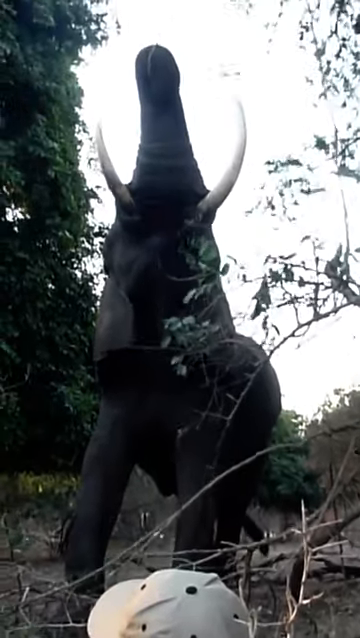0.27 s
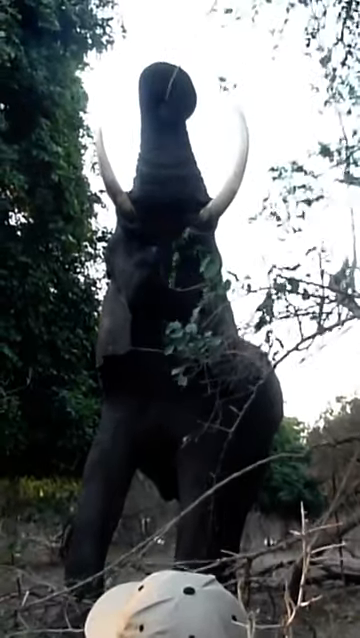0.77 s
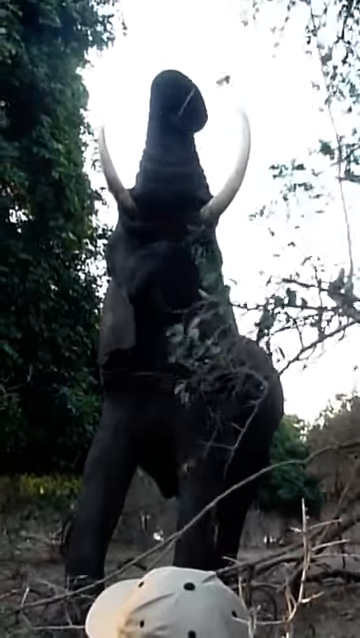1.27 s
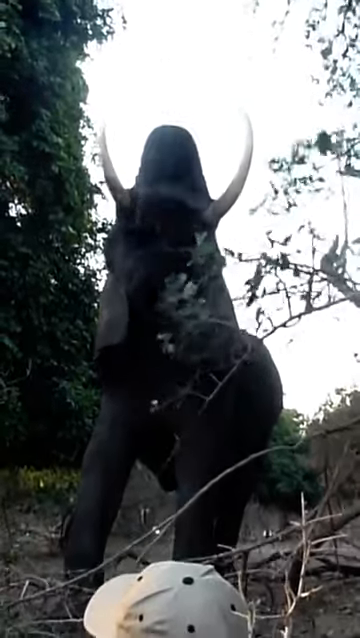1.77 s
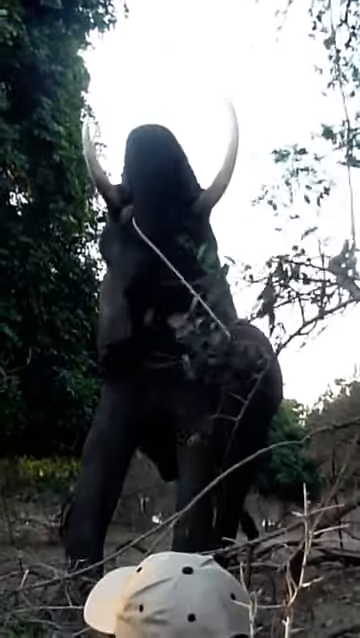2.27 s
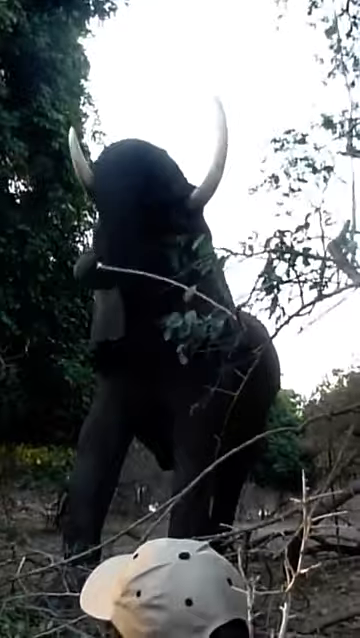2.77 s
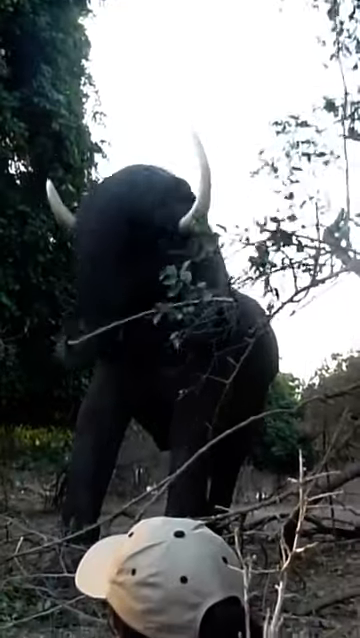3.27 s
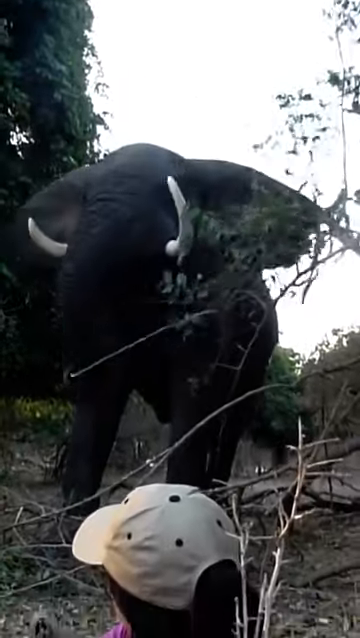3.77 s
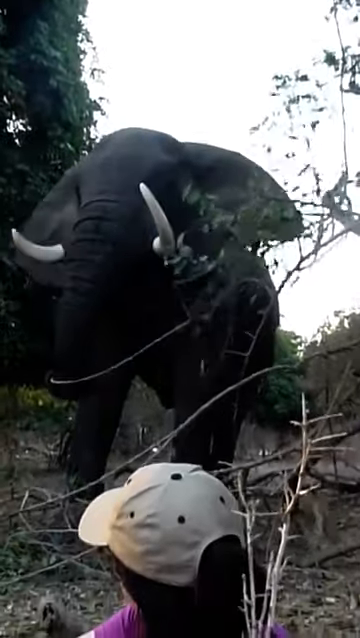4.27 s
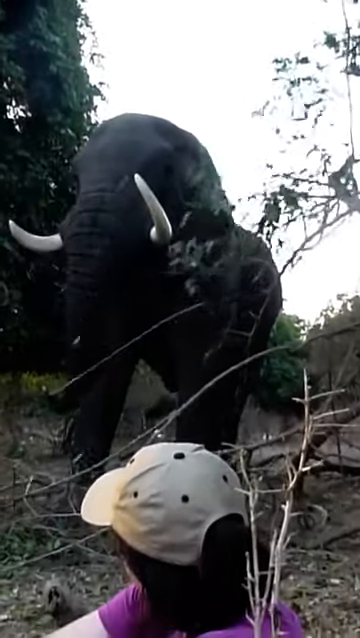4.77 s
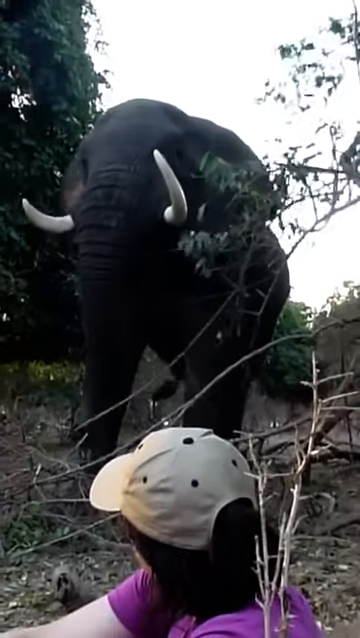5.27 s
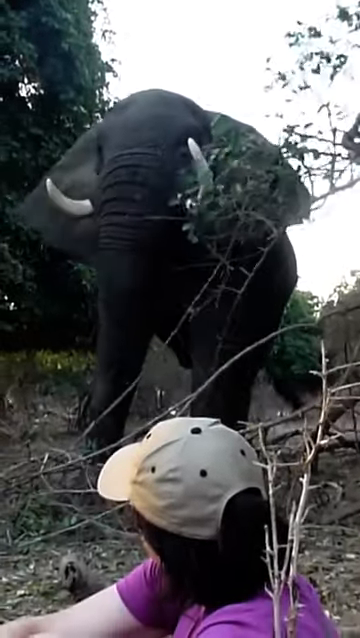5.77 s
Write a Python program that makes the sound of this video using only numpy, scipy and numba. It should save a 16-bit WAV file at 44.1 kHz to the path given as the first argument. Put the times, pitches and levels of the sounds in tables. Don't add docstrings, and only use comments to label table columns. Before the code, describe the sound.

Dry crackling twigs and swelling leaf rustle close by for about four and a half seconds, fading to still air with brief bird whistles.

```python
import sys
import numpy as np
from scipy import signal
from scipy.fft import rfft, irfft
from scipy.io import wavfile
from scipy.ndimage import uniform_filter1d
from numba import njit

SR = 44100
rng = np.random.default_rng(int(sys.argv[2]) if len(sys.argv) > 2 else 0)


def volts_from_decibels(level):
    exponent = np.asarray(level, float) / 20
    return 10 ** exponent


def materialize(psi):
    bounded = np.clip(np.atleast_2d(psi).T, -1, 1)
    quanta = np.round(bounded * 32767).astype(np.int16)
    wavfile.write(sys.argv[1], SR, quanta)


N = 265482
T = np.arange(N) / SR
BINS = np.fft.rfftfreq(N, 1 / SR) + 1e-9

# start_s, level_db, left_minus_right_db
STIR = [(0, -36, 0.5), (.1, -39.5, 1), (.33, -38.5, 0), (.59, -42.5, 1), (1.24, -43, .5), (1.46, -40, 0),
        (1.63, -41, 0.5), (2.18, -38, -0.5), (2.43, -43.5, .5), (2.92, -43.5, 0), (3.45, -41.5, 0),
        (3.7, -47.5, -.5), (3.94, -37.5, 0), (4.32, -41.5, -1), (4.62, -43.5, -0.5), (5.16, -53, -1),
        (5.6, -57, -.5), (6.02, -52.5, -1)]
# pitch_hz, level_db (per Hz)
CRACK_COLOUR = [(180, -51), (300, -26), (1280, -48), (1730, 0), (2910, -12), (6150, 8), (7280, 7.5),
                (10700, 4), (11500, -22), (15000, -52), (22000, -120)]


def unit(x):
    return x / np.sqrt(np.mean(x ** 2))


def on_bins(points):
    hz, value = np.transpose(points)
    return np.interp(np.log(BINS), np.log(hz), value)


def colour(x, gain):
    return irfft(rfft(x) * gain, N)


def spread(mid, side):
    # pitch_hz, likeness (0-1)
    likeness = [(30, .68), (100, 0.74), (300, 0.59), (700, 0.58), (4000, 0.58), (7000, 0.43), (10000, 0.26)]
    like = np.clip(on_bins(likeness), 0, 1)
    mid = colour(mid, np.sqrt((1 + like) / 2))
    side = colour(side, np.sqrt((1 - like) / 2))
    return np.array([mid + side, mid - side])


def panned(pan_db):
    return volts_from_decibels(np.array([pan_db, -pan_db]) / 2)


def walk(per_s):
    hold = int(SR / per_s)
    steps = np.repeat(rng.standard_normal(N // hold + 1), hold)
    return uniform_filter1d(steps, hold)[:N]


@njit
def grains(start, hz, t60, size, n):
    out = np.zeros(n)
    for g in range(len(start)):
        turn = np.exp(2j * np.pi * hz[g] / SR - np.log(1000) / (t60[g] * SR))
        ring = size[g] + 0j
        for i in range(start[g], min(n, start[g] + int(t60[g] * SR))):
            out[i] += ring.real
            ring *= turn
    return out


def leaf_noise(per_s, cycles, scatter_db, hiss_db):
    when, height, luck, sign = rng.random((int(per_s * N / SR), 4)).T
    hz = 700 * 15 ** height
    size = volts_from_decibels(-scatter_db * np.log(luck + 1e-4)) * np.sign(sign - 0.5)
    near = grains((when * N).astype(np.int64), hz, cycles / hz, size, N)
    near = colour(near, np.sqrt(BINS))
    return unit(near) + volts_from_decibels(hiss_db) * rng.standard_normal(N)


def tugs():
    # start_s, hold_s, leaves_db, wood_db
    pulls = [(0.19, 0.054, -31.5, -49.5), (0.348, 0.09, -32, -51.5), (0.617, 0.093, -43.5, -67),
             (0.885, 0.13, -40, -50.5), (1.087, 0.048, -39.5, -50), (1.29, 0.09, -33, -46.5),
             (1.384, 0.22, -32.5, -48), (1.84, 0.035, -36, -46), (2.105, 0.057, -37.5, -47),
             (2.621, 0.044, -36.5, -47), (3.025, 0.027, -39, -46), (3.334, 0.13, -56, -50),
             (3.751, 0.022, -35.5, -46.5), (3.913, 0.085, -38.5, -48), (4.128, .12, -40, -47.5),
             (2.458, .08, -47, -48.5), (4.048, 0.059, -34.5, -44), (4.415, .07, -33, -46),
             (4.487, .02, -29, -50), (4.605, 0.072, -44, -57.5)]
    attack_s, fall_db_s = 0.029, 185
    power = np.zeros((2, N))
    for s, hold_s, leaves_db, wood_db in pulls:
        swell = np.clip((T - s) / attack_s + 0.5, 0, 1)
        release = volts_from_decibels(-fall_db_s * np.clip(T - s - hold_s, 0, 1))
        power += (volts_from_decibels([[leaves_db], [wood_db]]) * swell * release) ** 2
    return power


def all_twigs():
    # start_s, peak_db, ring_hz, leaves_db (under the crack)
    green = [(.141, -26, 3540, -7.5), (.18, -21, 5810, -12.5), (0.2179, -7, 6000, -16),
             (.507, -10.5, 7550, -17.5), (0.728, -22.5, 4710, -10), (1.1263, -22, 5640, -19),
             (1.6033, -22, 6830, -15), (1.8147, -24.5, 5800, -9), (1.9535, -34, 3490, -9),
             (2.141, -18, 7600, -9.5), (2.469, -28, 4410, -7), (2.7229, -18, 4430, -11.5),
             (3.1064, -28, 2700, -15), (3.238, -32, 2990, -7), (3.376, -24.5, 2960, -12),
             (3.484, -28.5, 2700, -6.5), (3.522, -23.5, 7990, -13.5), (4.038, -14.5, 5380, -9.5),
             (4.244, -25, 2800, -10.5), (4.3492, -27, 3190, -13), (4.481, -20, 3710, -9),
             (4.6586, -20, 2680, -20), (4.9926, -41, 3690, -6), (5.6735, -24.5, 7790, -18.5)]
    # start_s, peak_db, ring_hz, left_minus_right_db, leaves_db (under the crack)
    brittle = [(0.2446, -17, 5220, .5, -15), (0.3715, -7, 4220, 6, -17.5), (1.2751, -15, 7300, 3.5, -9.5),
               (1.2782, -11.5, 6800, 3, -17.5), (1.331, -20, 8200, 1, -17), (1.3915, -17, 8000, 1, -20),
               (1.2953, -15, 6500, 1, -17), (1.341, -20, 3700, -6, -18), (1.3877, -1.5, 7600, 3, -20.5),
               (1.4377, -14, 5640, 0, -20), (1.5853, -16, 9290, 1, -22), (1.9937, -1.5, 7000, 1.5, -16),
               (2.094, -15.5, 8200, -1, -13), (2.1193, -18, 6600, -3, -19), (2.6108, -15.5, 7500, 4, -13),
               (3.419, -19, 8600, 2, -12.5), (3.6176, -11.5, 6700, -1.5, -16.5),
               (3.7386, -16, 9620, -1, -17), (3.7908, -21, 8410, -1.5, -26),
               (3.807, -18.5, 4260, -3.5, -11.5), (3.8293, -9, 6400, -4.5, -9.5),
               (4.079, -18.5, 6630, 0, -5), (4.1424, -14, 5900, -.5, -18), (4.1862, -8, 6400, -2, -15.5),
               (4.5029, -4, 8000, -2.5, -14)]
    # start_s, peak_db, ring_hz, left_minus_right_db
    small = [(0.3545, -21, 6490, 7), (.4294, -31, 4310, 1), (0.8833, -28, 3800, 4),
             (0.9773, -21.5, 5900, 6), (1.929, -29, 2950, -4), (2.2894, -23, 7040, 1),
             (2.4254, -27, 6540, 3), (2.6328, -21, 4840, 5), (2.809, -30, 6580, -6), (2.834, -21, 7040, 2),
             (3.034, -24, 6180, 0), (3.151, -21.5, 6230, -4), (3.258, -19.5, 7000, -3),
             (3.354, -33, 4380, -1), (3.652, -26, 2900, -2), (3.9065, -31, 5610, 2),
             (3.9906, -19.5, 3170, -1.5), (4.062, -15, 6360, -1), (4.522, -19, 3700, -1),
             (4.604, -21.5, 2700, -3), (4.9545, -27.5, 2970, -3), (5.2304, -34, 3820, -1.5)]
    stir_s, _, stir_pan_db = np.transpose(STIR)
    rows = []
    for s, peak_db, hz, leaves_db in green:
        pan_db = np.interp(s, stir_s, stir_pan_db)
        fall_db = 5 + 0.09 * peak_db
        rows.append((s, peak_db, hz, pan_db, leaves_db, fall_db))
    rows += [(*twig, 7.5) for twig in brittle]
    rows += [(*twig, -12.5, 10.5) for twig in small]
    return rows


def after_twigs(rise_s):
    power = np.zeros((2, N))
    for s, peak_db, _, pan_db, leaves_db, fall_db in all_twigs():
        i = slice(max(int(s * SR) - 600, 0), int(s * SR) + 9000)
        age = T[i] - s - 0.0007
        strain_s = rise_s * volts_from_decibels(1.6 * max(peak_db + 14, 0))
        rise = np.exp(np.minimum(age, 0) / strain_s)
        decay = volts_from_decibels(-200 * np.clip(fall_db, 1, 40) * age)
        level = panned(pan_db)[:, None] * volts_from_decibels(peak_db + leaves_db)
        power[:, i] += level ** 2 * np.where(age < 0, rise, decay)
    return power


def foliage():
    # pitch_hz, level_db (per Hz)
    leaf_colour = [(15, -45), (25, -5.5), (252, -3.5), (370, -5.5), (466, 1), (739, -6.5), (840, -8),
                   (1680, -6), (1810, -8.5), (3270, -1.5), (7060, 1.5), (10600, -1), (11500, -3),
                   (15000, -55), (22000, -120)]
    edges_hz = (280, 850, 2200)
    # steady_db, share of the stir followed (0-1), tug_db, after_twig_db
    ranges = [
        (-43, 1, -1, 0),
        (-52, 0.71, 0, -14.5),
        (-54.5, 0.78, -0.16, -26.5),
        (-56.5, 0.17, -6, -25.5),
    ]
    usual_stir_db = -44
    s, level_db, side_db = np.transpose(STIR)
    stir_db, pan_db = np.interp(T, s, level_db), np.interp(T, s, side_db)

    stream = spread(leaf_noise(3000, 4.93, 2.18, 0.98), leaf_noise(3000, 4.9, 2.5, 0.16))
    stream = rfft(stream) * volts_from_decibels(on_bins(leaf_colour))
    below = [0] + [1 / (1 + (BINS / hz) ** 12) for hz in edges_hz] + [1]
    shaken, pulled, together = after_twigs(0.00031), tugs(), walk(30)
    out = 0
    for k, (steady_db, share, tug_db, twig_db) in enumerate(ranges):
        band = unit(irfft(stream * np.sqrt(below[4 - k] - below[3 - k]), N))
        moving = volts_from_decibels(steady_db + share * (stir_db - usual_stir_db)) ** 2
        moving = moving + pulled[min(k, 1)] * volts_from_decibels(tug_db) ** 2
        flutter = volts_from_decibels(1.2 * together + 1.14 * walk(21.97))
        steady = np.sqrt(moving) * flutter * panned(pan_db)
        out = out + band * np.sqrt(steady ** 2 + shaken * volts_from_decibels(twig_db) ** 2)
    return out


def air():
    # pitch_hz, level_db (per Hz)
    air_colour = [(150, -44), (250, -19), (293, -6.5), (396, -3), (860, -9), (1750, -11), (3690, -11),
                  (6420, -24), (6950, -10), (11000, -39), (14300, -65), (22000, -120)]
    insect_hz, insect_width_hz = 3720, 190
    hush = colour(spread(*rng.standard_normal((2, N))), volts_from_decibels(on_bins(air_colour)))
    insect_gain = np.exp(-((BINS - insect_hz) / insect_width_hz) ** 2)
    insects = colour(spread(*rng.standard_normal((2, N))), insect_gain)
    hush_db = -54 + 2.4 * walk(2.5)
    insects_db = -62.5 + 3 * walk(9)
    return unit(hush) * volts_from_decibels(hush_db) + unit(insects) * volts_from_decibels(insects_db)


def twigs():
    s, peak_db, hz, pan_db = np.transpose(all_twigs())[:4]
    chance = rng.random((len(s), 12))
    late_s = np.cumsum(np.c_[0 * s, 0.0003 + 0.0012 * chance[:, :3]], axis=1)
    weaker_db = 2.9 * np.sqrt(np.arange(4)) * (2.0 + chance[:, 4:8])
    size = volts_from_decibels(peak_db[:, None] - weaker_db)
    start = ((s[:, None] + late_s + 0.001004) * SR).astype(np.int64).ravel()
    pitch = (hz[:, None] * (1 + 0.049 * (chance[:, 8:] - 0.5))).ravel()
    other_pitch = pitch * (1 + 0.088 * (chance[:, :4].ravel() - 0.5))
    out = []
    for side, heard in zip(panned(pan_db), (pitch, other_pitch)):
        gain = (size * side[:, None]).ravel()
        ring = grains(start, heard, 14.0 / pitch, gain * volts_from_decibels(-2.0), N)
        tick = grains(start, pitch, 1.5 / pitch, gain * volts_from_decibels(-6.5), N)
        out.append(ring + colour(tick, volts_from_decibels(on_bins(CRACK_COLOUR))))
    return np.array(out)


def knocks():
    # start_s, peak_db, ring_hz, fall_db (per 10 ms)
    thick = [(0.374, -32.5, 1100, 4.5), (0.425, -37.5, 471, 19), (0.898, -45, 476, 18),
             (0.966, -39, 471, 5.5), (1.201, -42.5, 570, 16), (1.306, -40, 450, 12),
             (1.373, -20.5, 513, 20), (1.995, -31, 820, 11), (2.09, -42, 578, 1), (2.467, -39, 426, 7),
             (2.721, -38, 860, 16), (3.556, -42, 620, 16), (3.617, -35.5, 615, 5), (3.747, -41, 542, 0),
             (3.943, -34.5, 564, 6), (4.053, -35, 625, 1), (4.209, -38.5, 828, 3.5), (4.505, -33.5, 474, 7),
             (4.607, -40, 434, 7), (4.935, -38, 516, 21), (5.493, -37.5, 547, 13), (5.673, -42.5, 486, 16)]
    # start_s, peak_db, ring_hz, fall_db (per 10 ms)
    thin = [(1.994, -28, 1290, 23), (2.142, -29, 1160, 11), (3.833, -27, 1470, 19), (4.079, -27, 1580, 20),
            (5.492, -41, 850, 12), (5.674, -37, 1010, 16)]
    s, peak_db, hz, fall_db = np.transpose(thick + thin)
    t60 = 0.6 / np.clip(fall_db, 4, 80)
    lag = rng.integers(0, 9, (len(s), 2)).T
    stretch = 1 + 0.3 * (rng.random((len(s), 3)).T - 0.5)
    out = np.zeros((2, N))
    for side in range(2):
        start = ((s + 0.0012) * SR).astype(np.int64) + lag[side]
        out[side] = grains(start, hz, t60, volts_from_decibels(peak_db), N)
        for ratio, db, uneven in zip((0.86, 1.25, 1.6), (-6, -3, -9), stretch):
            out[side] += grains(start, ratio * uneven * hz, 0.8 * t60, volts_from_decibels(peak_db + db), N)
    out = colour(out, 1 / (1 + (380 / BINS) ** 6))
    push = np.hanning(40)
    return signal.lfilter(push / push.sum(), 1, out) * volts_from_decibels(2.0)


def ticks():
    # start_s, peak_db, ring_hz, left_minus_right_db
    clicks = [(0.4993, -28.5, 7920, 1.0), (0.7338, -25.0, 4820, 4.5), (0.9332, -30.0, 8270, 0.0),
              (0.9741, -27, 3450, 4.5), (0.9808, -30, 5860, 3.0), (1.0785, -32.0, 7920, -0.5),
              (1.136, -28.0, 5170, 0.5), (1.1497, -24, 8610, 3.0), (1.2946, -16, 8100, 1.5),
              (1.4708, -23.5, 5860, 1.0), (1.6053, -20.0, 8960, 4.5), (1.7298, -29.5, 5860, 3.0),
              (1.8158, -26, 5860, 2.5), (1.8315, -22, 7580, -0.5), (1.9569, -31.0, 4820, -1.0),
              (2.1418, -18.5, 7580, -5.5), (2.2938, -28.5, 6890, 2.0), (2.3323, -27, 3620, -4.5),
              (2.8334, -26.0, 10340, 5.0), (3.0127, -32, 4650, 3.5), (3.0417, -30.0, 5860, -1.5),
              (3.2607, -25, 9990, -3.0), (3.3904, -27.0, 2070, -1.5), (3.4697, -34.0, 6720, 0.0),
              (3.5649, -28, 3100, -3.5), (3.6528, -31, 3100, -2.5), (3.7503, -22, 9650, 0.0),
              (3.8367, -16, 6720, -7.0), (3.9078, -29.0, 10160, -1.0), (3.9446, -28.0, 4130, -0.5),
              (3.9623, -26.0, 6890, 0.5), (4.0349, -20, 3620, 1.0), (4.0413, -17.5, 9300, -1.0),
              (4.1524, -25.0, 5170, 0.0), (4.343, -33.5, 8440, -4.5), (4.5691, -27.5, 7240, -4.0),
              (4.7282, -33, 8270, -2.5), (4.7398, -34.5, 7920, -3.0), (4.7946, -35, 2760, 2.5),
              (4.8275, -36.5, 3450, -0.5), (5.0098, -36.5, 7240, -3.5), (5.454, -46.0, 7750, 0.5),
              (5.4995, -44.0, 2930, -4.0), (5.787, -44.5, 2410, 2.5)]
    # start_s, peak_db, ring_hz, t60_s
    stick_rings = [(1.9945, -26, 2040, .04), (1.9945, -24, 3390, .03), (1.9945, -25, 1310, 0.047),
                   (3.831, -26, 2570, .04), (3.831, -24, 2900, .03), (3.831, -23.5, 1485, 0.043),
                   (3.619, -28.5, 2550, 0.033), (4.4985, -19, 2600, 0.034), (4.504, -21, 3050, .03),
                   (4.484, -34, 500, .04), (4.504, -34, 500, .04), (4.525, -40, 450, .04),
                   (4.073, -32, 700, .05), (4.187, -24, 3300, .03), (1.5, -21, 3800, .025),
                   (2.637, -36, 260, 0.055), (1.86, -38, 330, .06), (5.498, -42, 850, .04),
                   (5.756, -49, 3000, .06), (1.9, -38, 800, 0.089), (2.15, -36, 820, .08)]
    s, peak_db, hz, pan_db = np.transpose(clicks)
    start = ((s - 0.0003) * SR).astype(np.int64)
    out = []
    for side, detune in zip(panned(pan_db), (0.97, 1.03)):
        gain = volts_from_decibels(peak_db) * side
        edge = grains(start, hz, 1.6 / hz, gain * volts_from_decibels(-2.0), N)
        ring = grains(start, detune * hz, 12.0 / hz, gain * volts_from_decibels(1.0), N)
        out.append(ring + colour(edge, volts_from_decibels(on_bins(CRACK_COLOUR))))
    s, peak_db, hz, t60 = np.transpose(stick_rings)
    rings = grains((s * SR).astype(np.int64), hz, t60, volts_from_decibels(peak_db), N)
    push = np.hanning(12)
    return np.array(out) + signal.lfilter(push / push.sum(), 1, rings)


def swishes():
    # start_s, peak_db, pitch_hz, length_s
    puffs = [(1.301, -43.5, 258, 0.062), (2.634, -49, 215, 0.044), (3.905, -36.5, 210, 0.053),
             (4.499, -44, 181.4, 0.059), (4.602, -46, 205, 0.034), (4.795, -39.5, 143, 0.045),
             (4.84, -42, 168, 0.059), (4.9, -46, 168, 0.04), (4.935, -45, 118, 0.047), (5, -49, 130, .04),
             (4.96, -46, 181, 0.035)]
    out, flutter = np.zeros(N), walk(120)
    for s, peak_db, hz, length_s in puffs:
        i = slice(int(s * SR), int((s + length_s) * SR))
        part = (T[i] - s) / length_s
        turns = np.cumsum(hz * (0.952 + 0.091 * part + 0.2 * flutter[i])) / SR
        out[i] += volts_from_decibels(peak_db) * np.sin(np.pi * part) * np.sin(2 * np.pi * turns)
    return out


def bird(notes, wobble_db, wobble_hz, per_s=200):
    out = np.zeros(N)
    for note in notes:
        s, hz, db = np.transpose(note)
        gate = np.clip(np.minimum(T - s[0], s[-1] - T) / 0.0038, 0, 1)
        pitch = np.interp(T, s, hz) + wobble_hz * walk(per_s)
        level = volts_from_decibels(np.interp(T, s, db) + 6.5 + wobble_db * walk(140))
        out += gate * level * np.sin(2 * np.pi * np.cumsum(pitch) / SR)
    blur = rng.standard_normal(SR // 8) * volts_from_decibels(-60 * T[:SR // 8] / 0.25)
    return out + volts_from_decibels(-34) * signal.fftconvolve(out, blur)[:N]


def birds():
    # start_s, pitch_hz, level_db
    clear = [
        [(4.452, 2600, -42), (4.464, 2630, -39), (4.474, 2680, -46)],
        [(4.833, 2080, -53), (4.843, 2320, -44), (4.851, 2540, -39), (4.865, 2530, -45), (4.873, 2400, -43),
         (4.892, 2316, -41.5), (4.914, 2250, -56)],
    ]
    # start_s, pitch_hz, level_db
    low = [
        [(4.687, 1800, -54), (4.697, 2000, -52), (4.722, 2107, -60)],
        [(4.93, 1758, -65), (4.95, 1850, -44), (4.97, 1870, -60)],
        [(4.978, 1805, -51), (4.996, 2120, -44.5), (5.008, 1950, -54), (5.02, 1800, -56)],
        [(5.022, 1950, -56), (5.034, 2325, -48), (5.05, 2300, -61)],
    ]
    # start_s, pitch_hz, level_db
    rough = [
        [(4.765, 2720, -52), (4.787, 2626, -43), (4.81, 2650, -45.5)],
    ]
    # start_s, pitch_hz, level_db
    far = [
        [(5.29, 7120, -63), (5.322, 7132, -59), (5.37, 6700, -69)],
    ]
    out = bird(clear + low, 2.2, 22.0) + bird(far, 2.5, 70)
    out = out + bird(rough, 5.0, 280, per_s=1200)
    return out * panned(-4.5)[:, None]


def scene():
    return foliage() + air() + twigs() + knocks() + ticks() + swishes() + birds()


def discard(x):
    # pitch_hz, under_treble_db, silence_db, waver_db
    mask = [(60, -5, -75, -0.5), (500, -9, -73, 0.5), (1470, -8, -71, 9.5), (2520, -6, -70, 6.5),
            (4030, -10, -74, 5.5), (8160, -7, -49, 9.5), (10600, -18.5, -46.5, 9)]
    # start_s, end_s, low_hz, high_hz, level_db
    lost = [(4.475, 4.535, 750, 2250, -24), (4.5, 4.595, 720, 2050, -22), (1.4, 1.445, 1000, 1850, -21),
            (3.78, 3.817, 1900, 2650, -22), (3.64, 3.695, 1650, 2050, -22), (5.76, 5.91, 9300, 13500, -45),
            (2.91, 3.07, 10200, 12800, -25), (5.33, 5.45, 10200, 13000, -28), (.23, .33, -220, 220, -16),
            (.35, .47, -200, 200, -11), (1.49, 1.6, -200, 200, -17), (4.56, 4.605, -320, 320, -12)]
    hz, s, z = signal.stft(np.array([x[0] + x[1], x[0] - x[1]]) / 2, SR, nperseg=1024)
    at_hz, under_db, silence_db, waver_db = np.transpose(mask)
    treble = np.sqrt(np.mean(abs(z[0, 70:230]) ** 2, axis=0))
    hidden = volts_from_decibels(np.interp(hz, at_hz, under_db))[:, None] * treble
    silence = volts_from_decibels(np.interp(hz, at_hz, silence_db) - 31.0)[:, None]
    limit = np.hypot(hidden, silence)
    waver = rng.standard_normal((len(hz) // 4 + 1, len(s) // 5 + 1))
    waver = np.kron(waver, np.ones((4, 5)))[:len(hz), :len(s)]
    limit = limit * volts_from_decibels(np.interp(hz, at_hz, waver_db)[:, None] * waver)
    limit = limit * volts_from_decibels([0, -5])[:, None, None]
    keep = 0.027 + 0.96 / (1 + (limit / (abs(z) + 1e-12)) ** 4)
    for t0, t1, low_hz, high_hz, db in lost:
        off_hz = (2 * hz[:, None] - low_hz - high_hz) / (high_hz - low_hz)
        off_s = (2 * s - t0 - t1) / (t1 - t0)
        inside = np.clip(3 * (1.15 - np.hypot(off_hz, off_s)), 0, 1)
        keep = keep * volts_from_decibels(db * inside * np.clip(1 + 0.064 * waver, 0, 2))
    mid, side = signal.istft(z * keep, SR, nperseg=1024)[1][:, :N]
    return np.array([mid + side, mid - side])


def band_limit(x):
    return signal.sosfilt(signal.butter(12, 12210, fs=SR, output="sos"), x)


def record(dry):
    top = signal.ellip(8, 0.3, 66, 10915, fs=SR, output="sos")
    cut = signal.sosfilt(top, dry)
    cut = colour(cut, 1 / np.sqrt(1 + (42 / BINS) ** 4))
    return band_limit(discard(cut))


dry = scene()
out = record(dry)
materialize(out)
```